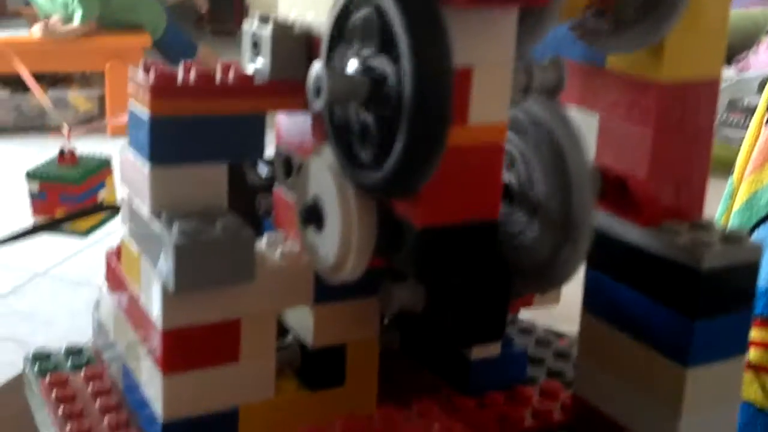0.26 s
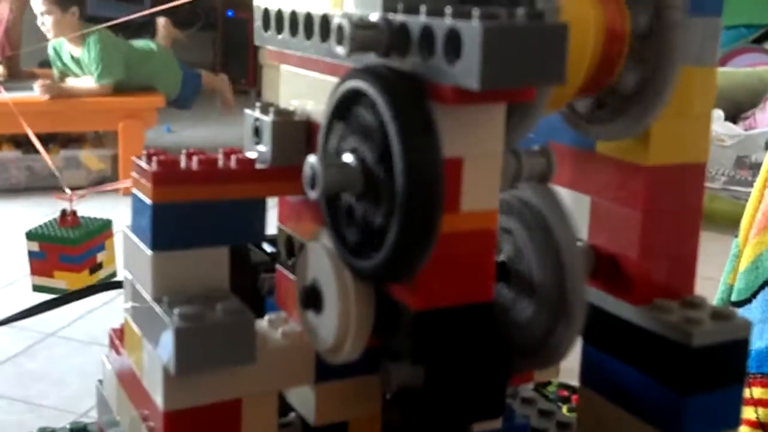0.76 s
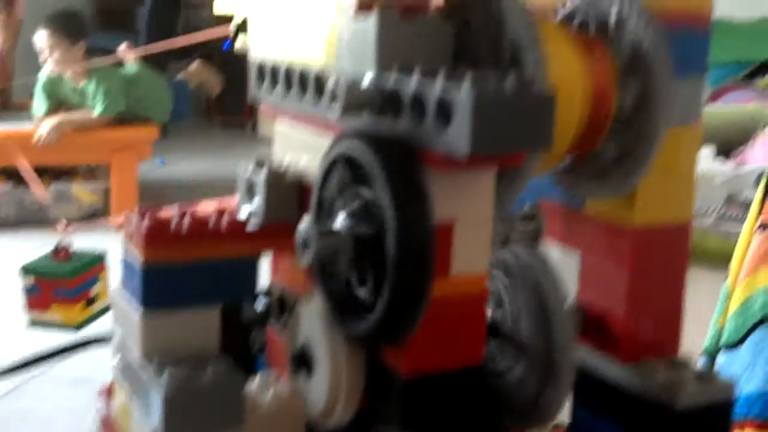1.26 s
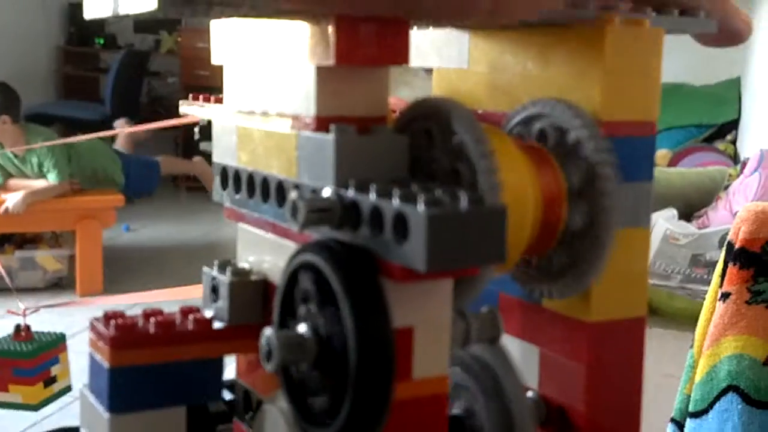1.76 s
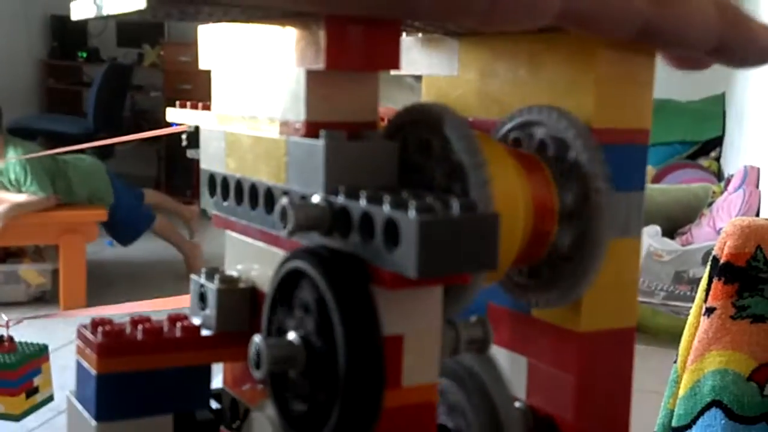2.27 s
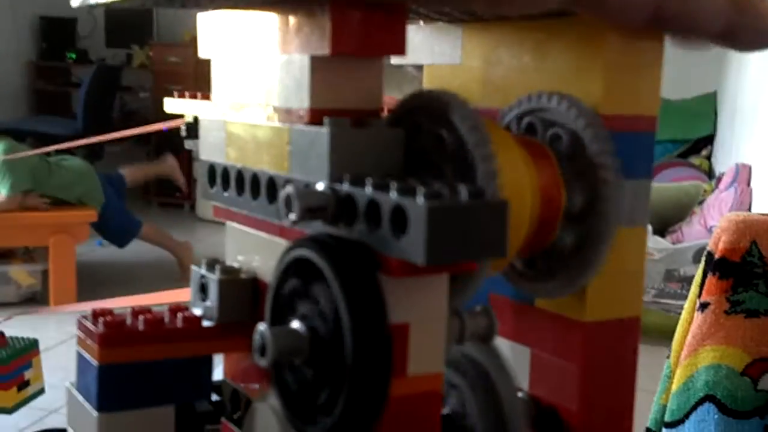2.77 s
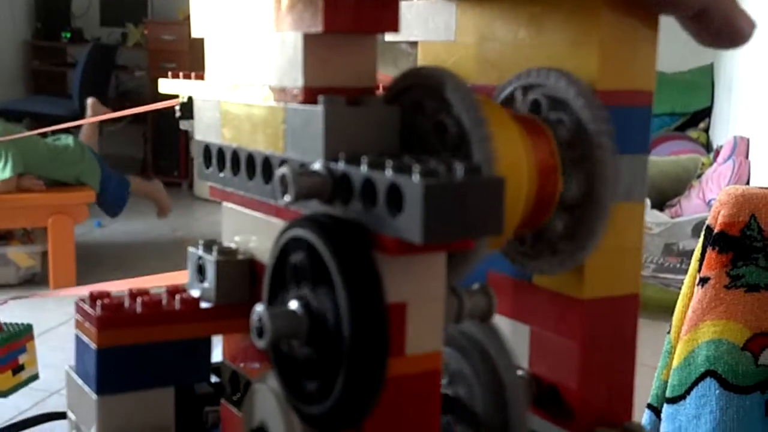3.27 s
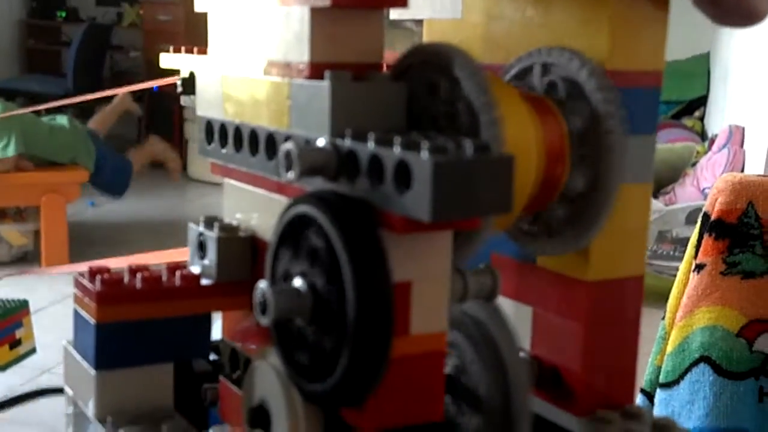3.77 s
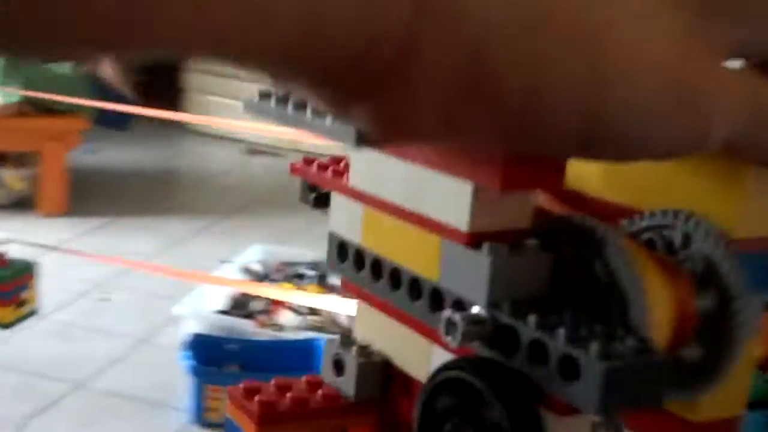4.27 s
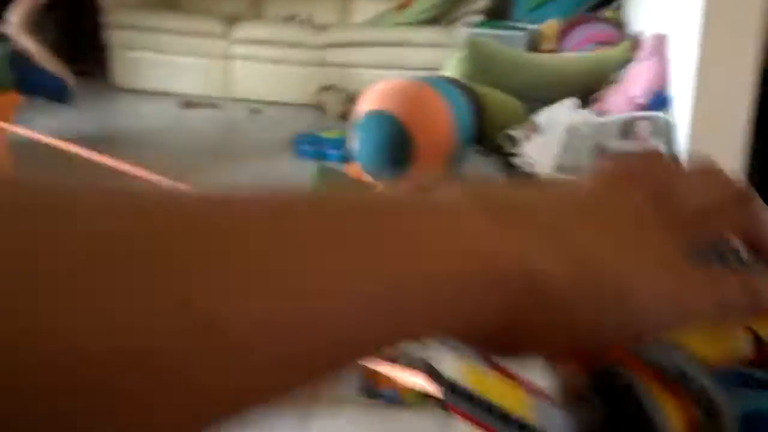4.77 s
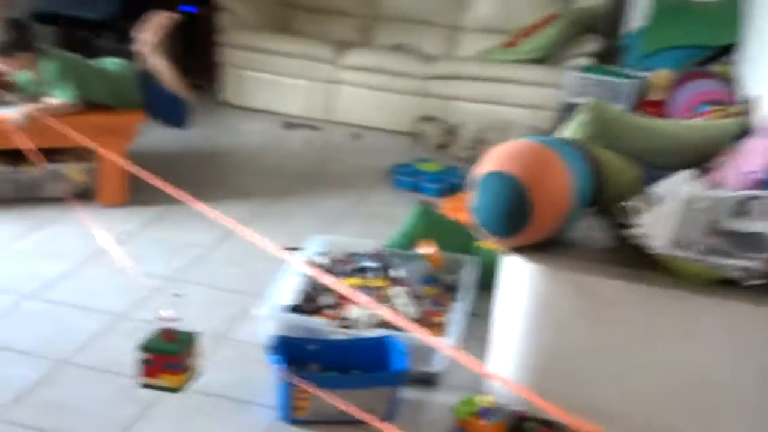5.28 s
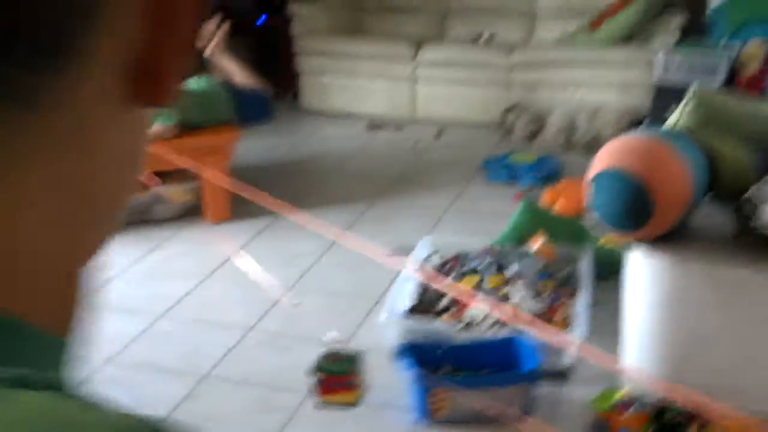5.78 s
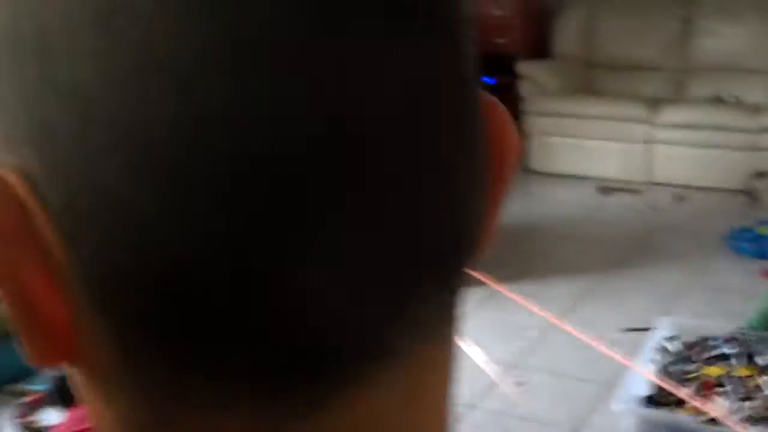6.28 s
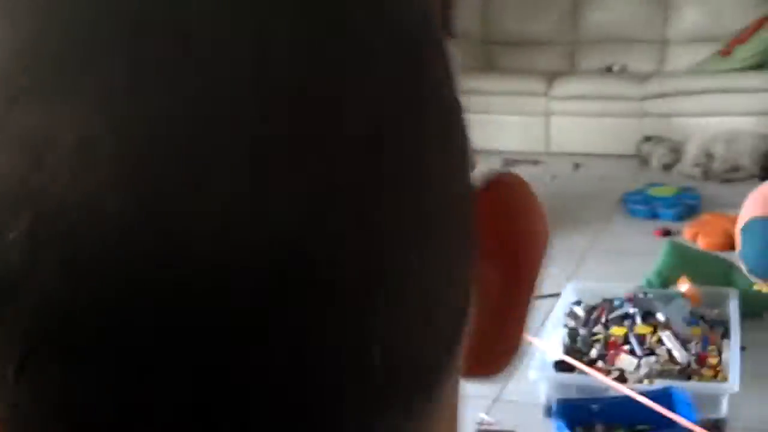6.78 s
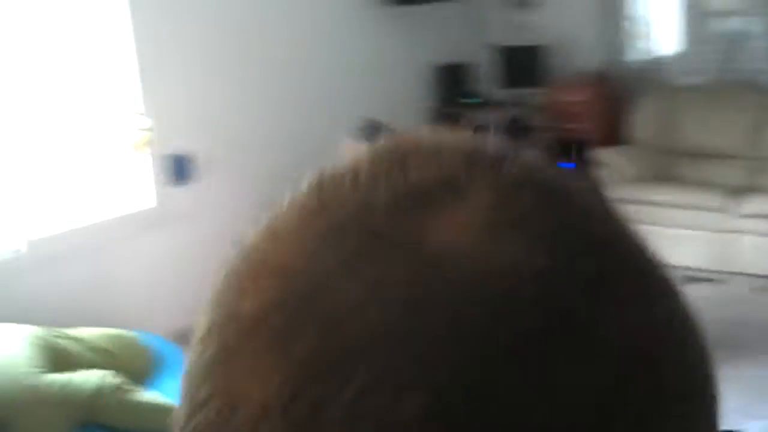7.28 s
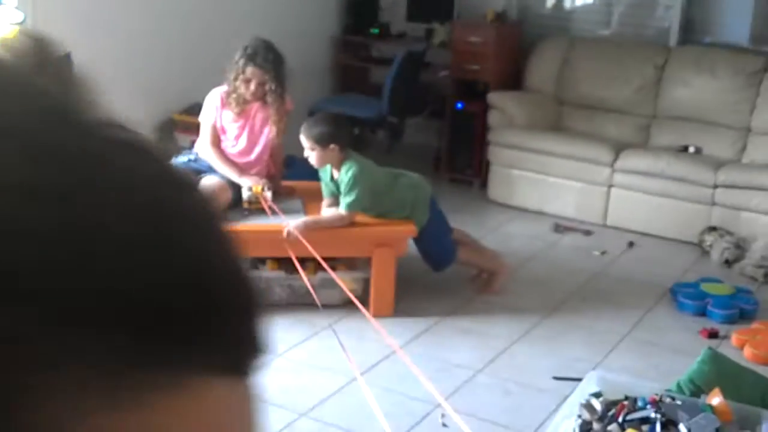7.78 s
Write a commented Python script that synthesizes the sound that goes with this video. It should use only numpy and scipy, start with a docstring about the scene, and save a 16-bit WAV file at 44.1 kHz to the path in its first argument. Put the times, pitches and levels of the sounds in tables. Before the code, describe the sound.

From 0 s a small toy winch is already running and continues to the end without stopping. Close to a handheld stereo microphone, its motors give a low steady hum and buzz, while meshing gears sing a nasal mid-pitched whine that flutters about ten times a second. Over this lies a dense, dry plastic rattle with gritty grinding and bright fizz, slightly uneven as the string load changes. Faint clicks come near 1.1, 3.7 and 4.4 s; the whine briefly surges at 3.7 and 4.7 s, and grinding is stronger from about 4 to 5 s. From 5.5 s the whine dips, a faint low tone sags, and a soft rumble swells until about 7.2 s. The microphone turns away: rattle weakens and shifts right, with more living-room reflection. Hard taps land at 6.5 and 6.6 s, a click at 6.75, and duller bumps at 7.0 and 7.6 s.

```python
"""Toy brick winch in a living room

Small electric motors drive the gears and string winch of a toy brick tower, heard close by in a living room.
Rotors hum as shaft-locked sines, a gear mesh whines and beats with a close lower gear line, and loose teeth
rattle the plastic frame as coloured noise. The two microphone ports of a hand-held camera turn away after
five seconds and are bumped; a pair of combs widens the stereo."""
import sys
import numpy as np
from scipy import signal
from scipy.fft import rfft, irfft, next_fast_len
from scipy.io import wavfile
from scipy.ndimage import uniform_filter1d, map_coordinates

SR = 44100
rng = np.random.default_rng(int(sys.argv[2]) if len(sys.argv) > 2 else 0)


def store_pcm(level_fs):
    """Save levels as 16-bit WAV."""
    pcm = np.round(np.clip(level_fs, -1, 1) * 32767).astype(np.int16)
    wavfile.write(sys.argv[1], SR, np.atleast_2d(pcm).T)


N = 354121  # samples, about 8 s


def amp(db):
    """Decibels to gain."""
    return 10 ** (np.asarray(db) / 20)


def unit(x):
    """Scale to rms 1."""
    return x / np.sqrt(np.mean(x ** 2) + 1e-20)


def along(points, hz):
    """Read (frequency [Hz], value) points on a log frequency axis."""
    f, v = np.transpose(points)
    return np.interp(np.log(hz + 1), np.log(f + 1), v)


def curves(rows):
    """One value per sample for each column after the time."""
    times, *columns = np.transpose(rows)
    return [np.interp(np.arange(N) / SR, times, column) for column in columns]


def wobble(rate):
    """A smooth random curve, rate knots a second."""
    coarse = np.arange(0, N + 32, 32)
    knots = rng.standard_normal(int(N * rate / SR) + 4)
    return np.interp(np.arange(N), coarse, map_coordinates(knots, [coarse * rate / SR]))


def chatter(rate):
    """Quick random jolts without slow swells."""
    jolts = wobble(rate)
    return jolts - uniform_filter1d(jolts, SR // 20)


def filtered(x, response):
    """Multiply the spectrum of x by a response of frequency."""
    m = next_fast_len(N + 8192)
    return irfft(rfft(x, m) * response(np.fft.rfftfreq(m, 1 / SR)), m)[..., :N]


def angle(hz, unsteady):
    """Angle [rad] of a turning part or tone whose rate wavers by a small share."""
    return 2 * np.pi * np.cumsum(hz * (1 + unsteady * wobble(14))) / SR


def partials(turn, table, flutter, side_shift_db=0, drift_db=0.5):
    """Lines locked to a shaft flutter, drift as the hand sways, and reach the two ports out of step."""
    out = np.zeros((2, N))
    for multiple, db, side_db in table:
        sway_db = drift_db * wobble(2.91)
        lead = np.arctan(amp(side_db + side_shift_db - 2 * sway_db))
        # one complex random curve shakes both size and phase
        shake = (1 + flutter * (wobble(28) + 1j * wobble(28))) / np.sqrt(1 + 2 * flutter ** 2)
        phase = round(multiple) * turn + rng.uniform(0, 2 * np.pi) + np.angle(shake)
        size = np.sqrt(2) * amp(db + sway_db / 2) * np.abs(shake)
        out += size * np.sin([phase + lead, phase - lead])
    return out


# likeness of the sound at the two microphone ports: (frequency [Hz], coherence [0-1])
PORT_LIKENESS = [(100, .95), (220, .94), (350, .87), (600, .83), (950, .78), (1200, .55), (1600, .3),
                 (2000, .1), (16000, 0)]


def rub(spectrum, contacts):
    """Dense tooth contacts ring through a noise colour at both ports, less alike in the treble; rms 1."""
    def mid_side_colour(hz):
        spread = np.arccos(np.clip(along(PORT_LIKENESS, hz), -1, 1)) / 2
        return amp(along(spectrum, hz)) * [np.cos(spread), np.sin(spread)]

    mid, side = filtered(contacts, mid_side_colour)
    return unit(np.array([mid + side, mid - side]))


def tooth_flaws(turn, share):
    """Tooth contacts: a share of their power comes round with every turn of a shaft, the rest is random."""
    turns = turn / (2 * np.pi)
    count = int(N / turns[-1])  # samples in a turn
    flaws = rng.standard_normal((2, SR))[:, (turns * count).astype(int) % count]
    return np.sqrt(share) * flaws + np.sqrt(1 - share) * rng.standard_normal((2, N))


# pull of the string on the whole gear train: (time [s], load [dB])
STRING_LOAD = [(0.0, 1), (0.06, -1.5), (0.44, 1), (0.56, -1.5), (0.68, -0.6), (1.28, 0), (1.38, -2.2),
               (1.6, -2), (1.7, -0.57), (3.2, -1), (3.28, 0.5), (3.58, -2), (3.66, -0.5), (5.03, -0.5),
               (5.08, -2), (5.24, -1), (5.3, -3), (5.42, -1.5), (5.5, 0.5), (5.58, -2.5), (5.98, 0),
               (6.08, -1.2), (6.8, 0), (7.04, -0.4), (7.2, -2), (7.28, -0.8), (7.42, 0.3), (7.66, -0.9),
               (8.02, -0.5)]
# the camera rises over the winch, turns to the room and passes close behind a head:
# (time [s], raised [0-1], turned away [0-1], head close [0-1])
CAMERA_PLACE = [(0, 0.2, 0, 0.1), (3.85, 0.23, 0, 0.27), (4.25, 0.83, 0.14, 0), (4.95, 0.96, 0.01, 0.46),
                (5.35, 1, 0.03, 0), (5.95, 0.96, 0.27, 0.55), (6.3, 0.04, 0.81, 0.87),
                (6.95, 0.04, 0.84, 0.87), (7.4, 0.35, 0.71, 0.1), (8.03, 0.14, 1.03, 0.3)]
# part: (level beside the gears [dB], gain when raised [dB], gain when turned away [dB], gain near the head [dB])
PART_LEVELS = { "rotor": (-42.5, -12.5, -3, 1.5), "drive": (-34, -2, -18, -3.5),
               "shaft": (-51, -3, -13.5, 10), "room hum": (-59.5, 4.5, 11, 4.5),
               "axle": (-51.5, -1.5, -8.5, 3), "base": (-36, -4.5, -10.5, 4),
               "drone": (-41, -1.5, -2.5, -0.5), "frame": (-35, 0, -5.5, -2.5),
               "clatter": (-32, 1.5, -5, 1.5), "rasp": (-30, -2.5, -7.5, 4), "fizz": (-39, 1.3, 3.5, -1),
               "room": (-51, 11.5, 14, 3.5), }


def heard(part, load_share):
    """Gain of a part: it grows with the load on the gears and changes with where the camera is."""
    load_db, = curves(STRING_LOAD)
    raised, away, head = curves(CAMERA_PLACE)
    beside_db, raised_db, away_db, head_db = PART_LEVELS[part]
    place_db = beside_db + raised_db * raised + away_db * away + head_db * head
    return amp(place_db + load_share * load_db)


# noise colour of the rumble: (frequency [Hz], relative level per Hz [dB])
RUMBLE_COLOUR = [(60, -33), (100, -9.5), (150, -11), (195, -4), (228, 5), (260, -9), (330, -13), (450, -28),
                 (700, -60)]
# swell of the rumble: (time [s], level [dB])
RUMBLE_LEVEL = [(0, -75), (5.2, -62), (5.6, -54), (5.85, -47.5), (6.2, -51), (6.6, -44), (6.9, -47),
                (7.1, -44), (7.4, -53), (8.03, -56)]


def rumble():
    """A dull low rumble, coloured noise, swells and fades as the camera swings round."""
    db, = curves(RUMBLE_LEVEL)
    return amp(db + 1.2 * wobble(11)) * rub(RUMBLE_COLOUR, rng.standard_normal((2, N)))


# noise colour of the machine heard through the room: (frequency [Hz], relative level per Hz [dB])
ROOM_COLOUR = [(100, -16), (180, -4.5), (225, -2.5), (280, 7), (340, -2), (480, 2), (1200, 4), (1600, 5),
               (2400, 5.5), (3200, -19), (5000, -37)]
# axle line, then rotor line, that the room favours, before the part's level:
# (multiple of the turning rate, level [dB], side over mid [dB])
ROOM_AXLE_LINE = [(8, 0.5, -33)]
ROOM_ROTOR_LINE = [(6, -8, 3)]


def room_sound(rotor, axle):
    """The room answers the machine with coloured tooth noise and favours two of its shaft lines."""
    contacts = tooth_flaws(axle, share=0.2) * amp(0.42 * wobble(11))
    noise = heard("room", load_share=0.97) * rub(ROOM_COLOUR, contacts)
    hum = heard("room hum", load_share=.8) * partials(axle, ROOM_AXLE_LINE, flutter=0.51)
    whine = heard("room hum", load_share=.8) * partials(rotor, ROOM_ROTOR_LINE, flutter=0.36)
    return noise + hum + whine


# short low tone that sags in pitch: (time [s], frequency [Hz], level [dB])
SAGGING_TONE = [(5.46, 296, -90), (5.52, 296, -42.5), (5.6, 286, -42.5), (5.74, 279, -43), (5.85, 274, -90)]


def low_tone():
    """A faint pure tone slides down into the rotor hum."""
    hz, db = curves(SAGGING_TONE)
    return np.sqrt(2) * amp(db) * np.sin(angle(hz, unsteady=0.0025))


def ping(start_s, db, hz, t60):
    """One damped ring; t60 is the time [s] it takes to fall by 60 dB."""
    t = np.maximum(np.arange(N) / SR - start_s, 0)
    return amp(db - 60 * t / t60) * np.sin(2 * np.pi * hz * t)


# hard plastic edges click and knock, before the low cut:
# (time [s], starting level [dB], ring [Hz], 60 dB decay [s])
PLASTIC_CATCHES = [(1.07, -25, 470, .04), (3.685, -25, 410, .09), (3.69, -25, 770, .1),
                   (4.385, -26, 470, .04), (6.4897, -17.5, 1100, .005), (6.752, -22, 1080, 0.045),
                   (6.754, -21.5, 3550, 0.028)]
# bumps on the camera body, before the low cut:
# (time [s], starting level [dB], ring [Hz], 60 dB decay [s], right port's share [ratio])
CAMERA_BUMPS = [(6.4895, -6.5, 510, .015, .2), (6.619, -11, 420, .024, -.05), (6.639, -30, 380, .12, -.3),
                (6.995, -26, 350, .06, .3), (7.595, -21, 125, .09, .6)]


def knocks():
    """Parts catch now and then; fingers bump the small camera body, which gives a tap without deep bass."""
    catches = sum(ping(*row) for row in PLASTIC_CATCHES)
    bumps = np.zeros((2, N))
    for start_s, db, hz, t60, right_share in CAMERA_BUMPS:
        bumps += np.outer([1, right_share], ping(start_s, db, hz, t60))
    low_cut_hz = 220
    return filtered(catches + bumps, lambda hz: (1j * hz / (low_cut_hz + 1j * hz)) ** 3)


# lines of the axle, its booming line, and lines of the loudest gear's own shaft, before each part's level:
# (multiple of the turning rate, level [dB], side over mid [dB])
AXLE_LINES = [(3, -26.5, -23), (6, -21, -12), (7, -19, -12), (9, -16, -1), (11, -12.5, -19), (12, -22, -30),
              (19, -9, -25)]
AXLE_BOOM = [(4, 1, -14)]
GEAR_SHAFT_LINES = [(10, -.5, -20), (11, -7, -20), (16, 1, -15), (21, 0, -20), (26, -3, -15), (27, 0, -15),
                    (28, -4, -10), (29, -4, -8), (32, -3, -8), (77, -4, -5), (79, -5, -5), (80, -5, -5)]


def axle_growl(axle, shaft):
    """Two geared-down shafts shake the base on many multiples of their turns, and their close lines beat."""
    growl = heard("base", load_share=0.93) * partials(axle, AXLE_LINES, flutter=0.42)
    throb = heard("shaft", load_share=0.91) * partials(shaft, GEAR_SHAFT_LINES, flutter=0.53)
    boom = heard("axle", load_share=1.0) * partials(axle, AXLE_BOOM, flutter=0.19)
    return growl + throb + boom


# gain of the commutator tone and of the rotor's fourth line, before the line levels:
# (time [s], tone [dB], fourth line [dB])
COMMUTATOR_LEVEL = [(0, -40, -43), (.25, -38.5, -42.5), (.65, -36.5, -49), (.95, -37, -46),
                    (1.4, -40.5, -53), (2.2, -38.5, -51), (2.8, -42, -50), (3.3, -41, -45), (3.6, -40, -56),
                    (4.3, -42, -52), (4.85, -35.5, -52), (5.35, -42.5, -50), (5.8, -34, -41.5),
                    (6.2, -36.5, -42), (6.8, -32.5, -41), (7.1, -38.5, -43), (7.4, -34.5, -47),
                    (7.6, -38, -44), (8.03, -35.5, -42)]
# gain of the rotor hum, before the line level: (time [s], level [dB])
HUM_LEVEL = [(0, -49), (.15, -43.5), (.32, -43.5), (.47, -58), (.62, -46), (.85, -44.5), (.98, -52),
             (1.2, -43), (1.38, -53), (1.52, -47), (1.85, -66), (2, -47), (2.17, -47), (2.32, -59),
             (2.55, -44), (2.68, -49), (2.85, -68), (2.98, -44.5), (3.17, -46), (3.35, -55), (3.62, -45.5),
             (3.85, -49), (4.02, -39.5), (4.25, -46), (4.62, -57), (4.76, -48), (4.98, -57), (5.28, -46),
             (5.5, -49), (5.95, -43), (6.4, -48), (6.9, -45.5), (7.08, -54), (7.3, -45), (7.7, -49),
             (8.03, -42)]
# lines of the rotor's unbalance, rotor buzz, passing poles, the rotor's fourth line, and the drive motor,
# before gain: (multiple of the turning rate, level [dB], side over mid [dB])
UNBALANCE_LINE = [(1, 2.5, -4.5)]
ROTOR_LINES = [(2, -8, -30), (6, -3.5, 22), (12, -9, 5), (13, -10, -15), (14, -35, 13), (24, -8.5, -9),
               (25, -10, 9), (29, -7, -16), (34, -17, -4), (36, -11.5, 9)]
POLE_LINES = [(3, -0.95, -47), (47, -31, 3), (48, -25, 0), (52, -20, 0), (54, -17, -4), (55, -14, 1),
              (57, -24, 0), (58, -23, 0)]
ROTOR_FOURTH_LINE = [(4, -2, -28)]
DRIVE_LINES = [(2, -17.5, -17), (3, -7, -22), (4, -16, -20), (5, -15, -12), (6, -19, -8), (10, -14, 0),
               (15, -10.5, 0), (20, -8.5, 0), (25, -5, -2), (32, -18, 0)]
# shift of side over mid [dB] when turned away: the ports hear the rotor more nearly in step
TURN_SIDE_DB = -25


def motors(rotor, drive):
    """Unbalanced rotors hum, fading and returning, and three poles pass the brushes in each turn."""
    pole_db, fourth_db = curves(COMMUTATOR_LEVEL)
    hum_db, = curves(HUM_LEVEL)
    _, away, _ = curves(CAMERA_PLACE)
    side_db = TURN_SIDE_DB * away
    hum = amp(hum_db) * partials(rotor, UNBALANCE_LINE, flutter=.1, side_shift_db=side_db)
    buzz_lines = partials(rotor, ROTOR_LINES, flutter=0.31, side_shift_db=side_db, drift_db=4.0)
    buzz = heard("rotor", load_share=0.22) * buzz_lines
    poles = amp(pole_db) * partials(rotor, POLE_LINES, flutter=.16 - .11 * away, drift_db=.4)
    fourth = amp(fourth_db) * partials(rotor, ROTOR_FOURTH_LINE, flutter=.35)
    whine = heard("drive", load_share=.8) * partials(drive, DRIVE_LINES, flutter=.4)
    return hum + buzz + poles + fourth + whine


# gain of the gear whine, before load and line levels: (time [s], level [dB])
WHINE_LEVEL = [(0, -32), (2.8, -33), (3.66, -30.5), (3.715, -27.5), (3.77, -32), (4.2, -32.5), (4.65, -31),
               (4.73, -25.5), (4.8, -32.5), (5.1, -31), (5.6, -40.5), (5.9, -33), (7.15, -36.5),
               (7.55, -31.5), (8.03, -31.5)]
# overtones of the tooth rate, before gain: (multiple of the tooth rate, level [dB], side over mid [dB])
MESH_OVERTONES = [(2, -15.5, -12), (3, -13.5, 0), (4, -13, 0), (5, -9, 0), (7, -22, 0)]
# narrow ringing of the hollow tower round the whine: (frequency [Hz], relative level per Hz [dB])
TOWER_COLOUR = [(570, -52), (640, 10.5), (690, 14.5), (750, 7), (800, -10)]
PORT_LEAD = .1  # half the phase step of the whine between the ports [rad]


def gear_whine(mesh, beat_hz):
    """Meshing teeth sing in the hollow tower, and beat with a close lower gear line."""
    whine_db, = curves(WHINE_LEVEL)
    load_db, = curves(STRING_LOAD)
    beat = angle(beat_hz, unsteady=0.002) - .65 + .45 * wobble(8)
    arrival = mesh + 0.33 * wobble(70) + np.array([[PORT_LEAD], [-PORT_LEAD]])  # the left port is nearer
    tooth_tone = amp(-3.2) * np.sin(arrival)
    lower_tone = amp(-9.3 + 1.5 * wobble(4)) * np.sin(arrival - beat)
    flicker = amp(1.3 * chatter(70) + 1.2 * chatter(170))
    fundamental = np.sqrt(2) * (tooth_tone + lower_tone) * flicker
    overtones = amp(-2.5) * partials(mesh, MESH_OVERTONES, flutter=0.69)
    strikes = rng.standard_normal((2, N)) * amp(1.6 * wobble(14)) * (1 + 0.2 * np.cos(beat))
    ring = amp(-8.0) * rub(TOWER_COLOUR, strikes)
    return amp(whine_db + 1.0 * load_db) * (fundamental + overtones + ring)


CLACKS_PER_S, CLACK_DECAY_S = 200, .001  # average rate, time to fall to 1/e
CLACK_SPREAD_DB, CLACK_DEPTH = 4, .36  # spread of sizes, gain added by a middling clack


def clacks():
    """Uneven tooth impacts at random times, each a sharp start and a quick decay, as a gain from 1 up."""
    sizes = amp(CLACK_SPREAD_DB * np.clip(rng.standard_normal(N), -2, 2))
    hits = (rng.random(N) < CLACKS_PER_S / SR) * sizes
    return 1 + CLACK_DEPTH * signal.lfilter([1], [1, -np.exp(-1 / (CLACK_DECAY_S * SR))], hits)


# noise colours of the rattle from low to high: (frequency [Hz], relative level per Hz [dB])
DRONE_COLOUR = [(25, -56), (70, -34), (105, -10.5), (150, -10.5), (185, -3.5), (235, -8.5), (270, -11),
                (310, -8.5), (370, -1.5), (460, -2.5), (560, -6.5), (620, 0.5), (800, -52)]
FRAME_COLOUR = [(560, -27), (740, 0), (800, -3), (880, -4), (960, -4), (1030, 0), (1130, -4), (1230, 6.5),
                (1330, -4.5), (1520, -7), (1900, -6.5), (2300, -69)]
CLATTER_COLOUR = [(1750, -31), (2050, 1.5), (2250, -2), (2400, 4.5), (2850, 4.5), (3200, 4), (3570, 5.5),
                  (3850, 1.5), (4300, 1), (4800, -43)]
RASP_COLOUR = [(4000, -75), (4500, -3.5), (4900, -1.5), (5300, -1), (6000, 2), (6400, -4.5), (6900, -8.5),
               (7500, -7), (8000, -10), (9200, -60)]
FIZZ_COLOUR = [(7300, -78), (8400, 4.5), (9400, -0.5), (10200, -4), (12800, -0.5), (14200, 3), (15600, 1.5),
               (19000, -39)]
# a grinding band near 3.3-4.3 kHz with its own level: (frequency [Hz], relative level per Hz [dB])
GRIND_COLOUR = [(3150, -48), (3480, 5), (3800, 6), (4150, 0.5), (4500, -32)]
# grinding: (time [s], level [dB])
GRIND_LEVEL = [(0, -40), (1.15, -43), (1.45, -41), (2, -38.5), (3.2, -37.5), (3.7, -41), (4.15, -34.5),
               (4.9, -34), (5.35, -45), (5.9, -35.5), (6.3, -56), (8.03, -54)]
# a narrow frame resonance that swells now and then: (frequency [Hz], relative level per Hz [dB])
NASAL_COLOUR = [(1300, -40), (1375, -1), (1425, 2), (1465, -4.5), (1540, -30)]
# swell of that resonance: (time [s], level [dB])
NASAL_SWELL = [(0, -51), (4.7, -48), (5.05, -42), (5.3, -45), (5.7, -44), (6.1, -60), (6.75, -49),
               (7.22, -54), (7.44, -36), (7.64, -48), (7.8, -40), (8.03, -47)]
# share of the contacts' power that repeats with every turn, from flaws in the teeth
FLAW_SHARE_LOW, FLAW_SHARE_HIGH = .25, .2


def gear_rattle(rotor, drive, axle, shaft):
    """Loose teeth buzz in step with the motors and the gear shaft, and shake the whole frame."""
    jolts = clacks() * amp(.52 * wobble(7) + .15 * wobble(25))
    motor_pulse = .07 * np.cos(rotor) + .045 * np.cos(drive)
    shaft_pulse = .045 * np.cos(3 * shaft) + .025 * np.cos(shaft / 2)
    contact = jolts * (1 + motor_pulse + shaft_pulse)
    winch = axle / 4

    def slow():
        return tooth_flaws(winch, FLAW_SHARE_LOW)

    def fast():
        return contact * tooth_flaws(shaft, FLAW_SHARE_HIGH)

    # each part of the gear train also shakes at its own random pace
    drone = heard("drone", load_share=0.6) * rub(DRONE_COLOUR, slow() * amp(1.5 * wobble(40)))
    frame = heard("frame", load_share=1.8) * rub(FRAME_COLOUR, contact * slow() * amp(0.89 * chatter(60)))
    clatter = heard("clatter", load_share=1.4) * rub(CLATTER_COLOUR, fast() * amp(0.72 * chatter(120)))
    rasp = heard("rasp", load_share=1.0) * rub(RASP_COLOUR, fast() * amp(0.81 * chatter(200)))
    fizz_shake = amp(1.3 * wobble(260) + 0.63 * wobble(7))
    fizz = heard("fizz", load_share=0.97) * rub(FIZZ_COLOUR, fast() * fizz_shake)
    grind_db, = curves(GRIND_LEVEL)
    grind = amp(grind_db + 0.45 * wobble(7)) * rub(GRIND_COLOUR, fast() * amp(0.92 * chatter(140)))
    nasal_db, = curves(NASAL_SWELL)
    nasal = amp(nasal_db) * rub(NASAL_COLOUR, contact * rng.standard_normal((2, N)))
    return drone + frame + nasal + clatter + grind + rasp + fizz


# turning rate and beat: (time [s], winch motor [Hz], beat rate of the gear whine [Hz])
TURNING_RATES = [(0, 271.3, 10.07), (1, 271.4, 9.95), (2.2, 271.5, 10), (3.2, 271, 9.97), (4.4, 270.8, 9.9),
                 (5, 271.2, 9.87), (5.7, 271.6, 10), (8, 271.7, 10.02)]
DRIVE_HZ = 238.3  # mean turning rate of the drive motor
MESH_HZ, MESH_TEETH = 687.4, 15  # mean teeth a second in the loudest gear pair, teeth on its gear
TURN_PAN_DB = -3  # left over right once the camera has turned away


def scene():
    """The running machine at the two ports; as the camera turns, it moves right and the room comes forward."""
    rotor_hz, beat_hz = curves(TURNING_RATES)
    _, away, _ = curves(CAMERA_PLACE)
    pan_db = TURN_PAN_DB * away
    rotor = angle(rotor_hz, unsteady=0.000806)
    drive = angle(DRIVE_HZ, unsteady=0.000997)
    mesh = angle(MESH_HZ, unsteady=0.0014)
    axle, shaft = rotor * 5 / 32, mesh / MESH_TEETH  # geared down
    background = rumble() + room_sound(rotor, axle) + low_tone() + knocks()
    machine = axle_growl(axle, shaft) + motors(rotor, drive)
    machine += gear_whine(mesh, beat_hz) + gear_rattle(rotor, drive, axle, shaft)
    return background + machine * amp([pan_db / 2, -pan_db / 2])


COMB_HZ = 2756  # spacing of the teeth within each comb


def widening(hz, gap_width=0.2):
    """Gains for mid and side: two interleaved combs share the sound between them at constant total power."""
    alike = np.clip(along(PORT_LIKENESS, hz), 0, .99)
    turn = np.pi * hz / COMB_HZ
    teeth = np.abs([np.sin(turn), np.cos(turn)])
    width = gap_width * np.sqrt(hz / COMB_HZ) * np.minimum(hz / COMB_HZ, 1)
    mid, side = teeth / (1 + (width / (teeth + 1e-6)) ** 6)
    power = (mid ** 2 * (1 + alike) + side ** 2 * (1 - alike)) / 2
    return np.array([mid, side]) / np.sqrt(power)


# the microphone ports differ in the bass: (frequency [Hz], left over right [dB])
PORT_BALANCE = [(120, 1.5), (270, 2.3), (380, 0), (560, -.7), (1000, 0)]
TOP_HZ = 15800  # band limit of the camera


def record(dry):
    """The camera widens the stereo image and keeps nothing above its band limit."""
    left, right = dry
    mid, side = filtered(np.array([left + right, left - right]) / 2, widening)

    def ports(hz):
        return amp(np.outer([.5, -.5], along(PORT_BALANCE, hz))) * (hz < TOP_HZ)

    return filtered(np.array([mid + side, mid - side]), ports)


dry = scene()
out = record(dry)
store_pcm(out)
```